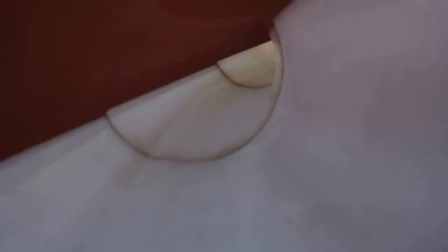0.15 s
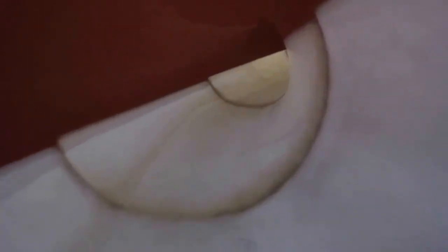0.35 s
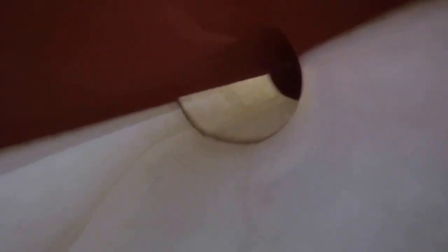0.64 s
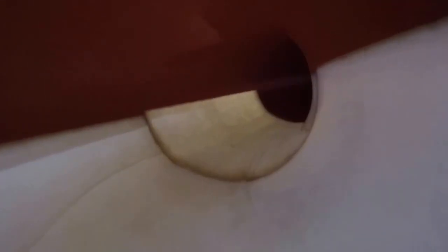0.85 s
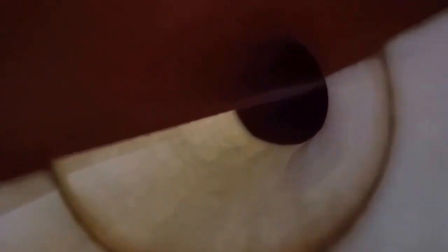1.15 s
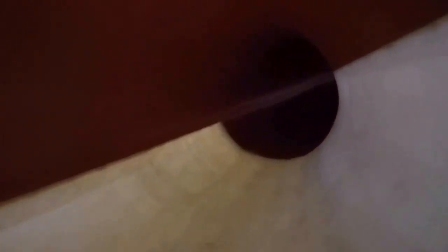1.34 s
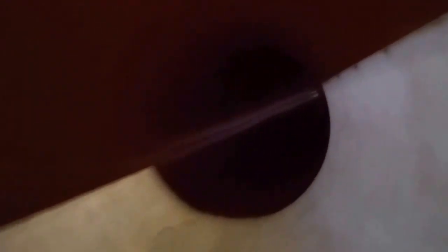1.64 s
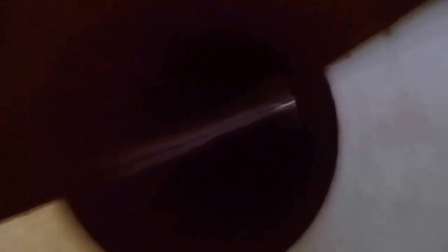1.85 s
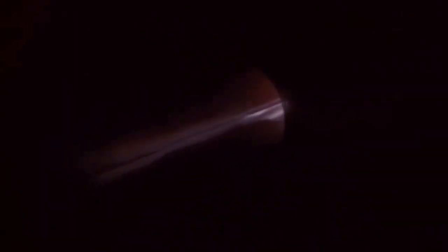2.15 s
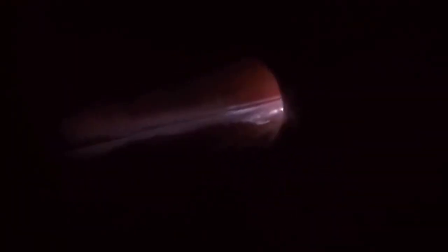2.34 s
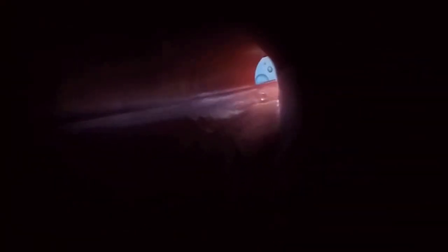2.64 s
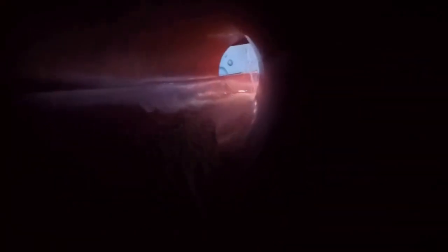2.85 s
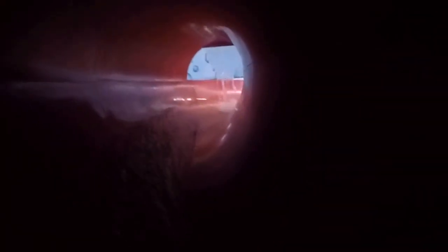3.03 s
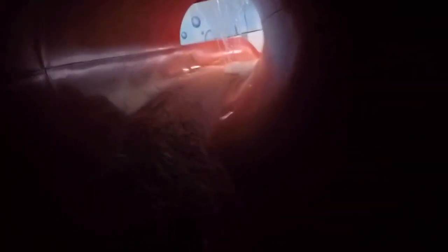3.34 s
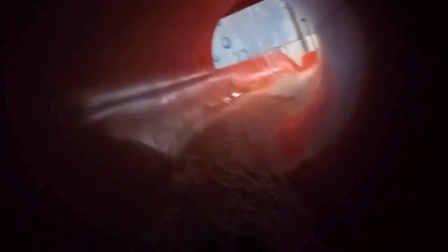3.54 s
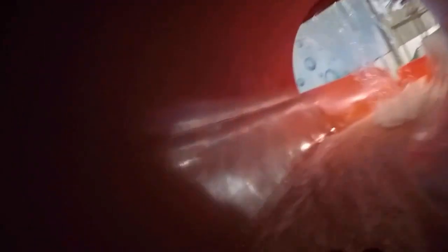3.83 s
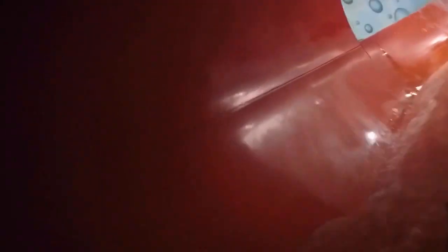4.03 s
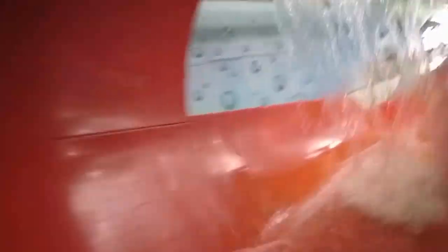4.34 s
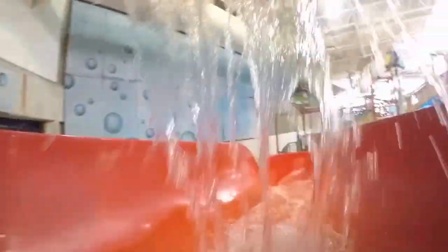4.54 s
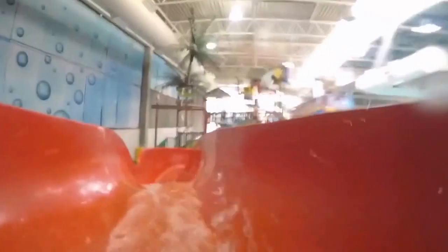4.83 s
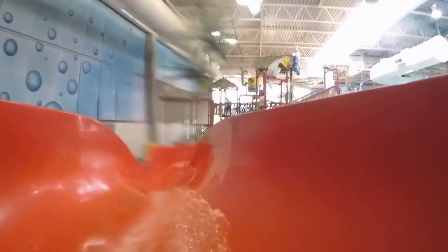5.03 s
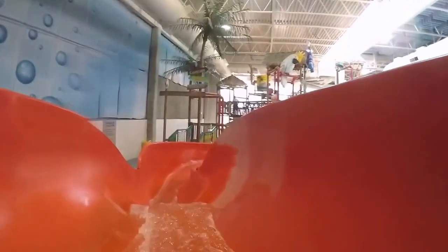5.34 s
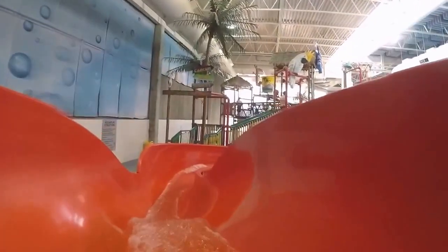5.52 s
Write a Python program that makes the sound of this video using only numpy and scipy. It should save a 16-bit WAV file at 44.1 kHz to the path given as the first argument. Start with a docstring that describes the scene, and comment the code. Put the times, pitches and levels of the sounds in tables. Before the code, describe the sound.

A close, mono ride recording: a thin sheet of water rushes and fizzes, with soft bumps at first. Hard rattling knocks, scuffs and deep thuds follow in clusters, some overloading. Falling water then smacks the case, leaving a brief wash, a dull lull and slowly returning muffled water in an indoor pool hall.

```python
"""A rider with a camera in a waterproof case slides down a plastic tube on a rushing film of water.
First come filtered noise for water and spray, a low rumble, and seams and bends that thump the body.
From about 2 s more and harder knocks (ringing shell notes) and scuffs (swelling noise) hit the case.
Near 4.75 s a curtain of water slaps the case (noise bursts and a low push) and wets the port.
One wash, a lull and a slow return follow: the run-out and the hall are faint and muffled."""
import sys
import numpy as np
from scipy.fft import rfft, irfft, next_fast_len
from scipy.io import wavfile
from scipy.ndimage import uniform_filter1d, map_coordinates

SR = 44100
rng = np.random.default_rng(int(sys.argv[2]) if len(sys.argv) > 2 else 0)


def unload_wav(signal):
    """Save mono or channel-first audio to the path in sys.argv[1] as 16-bit WAV at rate SR, clipped to [-1, 1]."""
    wavfile.write(
        sys.argv[1],
        SR,
        np.round(np.clip(np.atleast_2d(signal).T, -1, 1) * 32767).astype(np.int16),
    )


N = 250488
TIME = np.arange(N) / SR  # seconds, whole scene
HIT = np.arange(8192) / SR  # seconds, one short contact
FLOODED_S = 4.727  # the port starts to flood


def amp(db):
    """Turn decibels into a plain gain."""
    return 10 ** (np.asarray(db) / 20)


def unit(x):
    """Scale a sound to an average (rms) strength of 1."""
    return x / np.sqrt(np.mean(x ** 2) + 1e-20)


def along(points, hz):
    """Read a (frequency, level) curve, with frequency on a log axis."""
    point_hz, point_db = np.transpose(points)
    return np.interp(np.log(hz + 1), np.log(point_hz + 1), point_db)


def level_over_time(rows):
    """Join (time, level) points with straight lines, one value per sample."""
    times, levels = np.transpose(rows)
    return np.interp(TIME, times, levels)


def wobble(rate):
    """A smooth random curve through `rate` random points a second."""
    return map_coordinates(rng.standard_normal(400), [TIME * rate], mode="wrap")


def coloured(x, shape_db):
    """Filter a sound: shape_db gives the gain in dB at each frequency."""
    padded = next_fast_len(len(x) + 8192)
    gain = amp(shape_db(np.fft.rfftfreq(padded, 1 / SR)))
    return irfft(rfft(x, padded) * gain, padded)[:len(x)]


def noise(shape_db, size=N):
    """Random hiss with a chosen tone colour and an rms of 1."""
    return unit(coloured(rng.standard_normal(size), shape_db))


def causal(db):
    """Turn levels into a response that starts at once and then rings out (minimum phase)."""
    cepstrum = irfft(np.log(amp(db)))
    cepstrum[1:] *= 2
    cepstrum[len(cepstrum) // 2:] = 0
    return np.exp(rfft(cepstrum))


def hump(hz, centre_hz, octaves):
    """A bell of height 1 around centre_hz, its width given in octaves."""
    distance = np.log2((hz + 1) / centre_hz) / octaves
    return np.exp(-.5 * distance ** 2)


def swell(peak_s):
    """A contact force that rises to 1 at peak_s and dies away."""
    u = HIT / max(peak_s, 1e-4)
    return u * np.exp(1 - u)


def add(track, s, sound):
    """Mix a sound into the track at time s, cut off at the track's end."""
    room = track[max(round(s * SR), 0):][:len(sound)]
    room += sound[:len(room)]


def lift(modes, hz):
    """Boost in dB from resonances, each strongest at its own centre."""
    return sum(db / (1 + (2 * (hz - centre) / width) ** 2) for centre, width, db in modes)


# Tone of the case: (frequency [Hz], relative level [dB])
CASE_TONE = [(100, -9.5), (310, -0.5), (470, -15.5), (800, -1), (1200, 1), (1650, -0.5), (2200, -4.5),
             (2780, -1), (3300, -20), (4400, -18), (5500, -15.5), (6300, -32.5), (9000, -45.5),
             (15000, -40.5)]
# Notes of the struck shell: (frequency [Hz], width [Hz], boost [dB])
SHELL_NOTES = [(805, 180, 5.5), (1119, 80, 6), (1585, 260, 6), (2095, 360, 7), (2680, 160, 3.5),
               (5780, 520, 11)]


def shell(hz, centre_hz, focus_db):
    """Response of the case in dB; a contact favours the shell notes near centre_hz."""
    return along(CASE_TONE, hz) + lift(SHELL_NOTES, hz) + focus_db * hump(hz, centre_hz, 0.28)


def rub(centre_hz, swell_s, focus_db=10):
    """A short rub keeps the shell sounding, with a soft start."""
    return swell(swell_s) * noise(lambda hz: shell(hz, centre_hz, focus_db), size=len(HIT))


# The wet port: level while drowned, start of draining, speed of the sound's return
DROWNED_DB, DRAINS_S, RECOVERY_DB_PER_S = -61.5, 5.16, 23
# One wash of water runs over the case after the curtain
WASH_S, WASH_DB, WASH_WIDTH_S = 4.862, -53.5, .026
# Tone of water and hall through the wet port: (frequency [Hz], relative level [dB])
MUFFLED_TONE = [(150, 1), (330, -7), (520, -7), (850, -3.5), (1250, -7), (1530, 0), (1800, -6.5),
                (2200, -2.5), (2900, -5.5), (3500, -12), (5500, -12), (7200, -19.5), (9000, -24),
                (15000, -32)]


def runout():
    """Water and hall through the wet port: one wash, a lull, then the sound returns as the port drains."""
    level_db = DROWNED_DB + RECOVERY_DB_PER_S * np.maximum(TIME - DRAINS_S, 0)
    wash = amp(WASH_DB) * np.exp(-((TIME - WASH_S) / WASH_WIDTH_S) ** 2)
    return (amp(level_db) + wash) * noise(lambda hz: along(MUFFLED_TONE, hz))


# Shaking of the camera: (time [s], level before level_db [dB])
SHAKING = [(0.0, -40.5), (0.47, -37.5), (1.79, -39.5), (3.16, -33), (3.54, -37.5), (3.94, -29.5),
           (4.65, -32), (5.06, -52.5), (5.68, -58.5)]
# Tone of the rumble: (frequency [Hz], relative level [dB])
RUMBLE_TONE = [(11, -27.5), (18, -6), (32, 4), (59, -8.5), (92, -8), (199, -29), (289, -31.5), (400, -36.5),
               (520, -64), (880, -120)]


def rumble(level_db=4.0, lumps_db=2):
    """The uneven wall shakes the camera: low noise that swells and sinks in lumps."""
    lumps = amp(lumps_db * wobble(18))
    shaking = unit(lumps * noise(lambda hz: along(RUMBLE_TONE, hz)))
    return amp(level_over_time(SHAKING) + level_db) * shaking


SPRAY_GROWS = 1.25  # dB of spray per dB of flow
# Water under the rider: (time [s], flow level before the settings below [dB])
WATER_FLOW = [(0.0, -35.5), (2.1, -35), (3.14, -34.5), (3.33, -41.5), (3.51, -39.5), (3.77, -37.5),
              (4.18, -33.5), (4.6, -34)]
# Tone of the rushing sheet: (frequency [Hz], relative level [dB])
WATER_TONE = [(150, -12), (260, -15.5), (345, -5.5), (520, -15), (720, -6.5), (1050, -3.5), (1280, -8),
              (1650, -9), (2500, 0.5), (3000, -6), (3600, -9.5), (4600, -9), (7000, -22), (15000, -48)]
# Tone of the droplets: (frequency [Hz], relative level [dB])
SPRAY_TONE = [(1500, -39.5), (4000, -0.5), (5800, 4), (7400, 3.5), (8300, -3), (9600, -3), (11000, -5.5),
              (15300, -12.5)]
# Air and wall resonances of the case: (frequency [Hz], width [Hz], boost [dB])
CAVITY_NOTES = [(1612, 335, 9.5), (2141, 50, 8.5), (3313, 230, 12), (3737, 150, 9), (4090, 110, 4),
                (6600, 200, 6.5)]


def water(rush_db=2.5, spray_db=-8.0, curtain_db=4, curtain_s=.09, flutter_db=.5, drop_db=3,
          flood_s=0.005, leak_db=-25, leak_s=0.11):
    """The sheet of water rushes and throws droplets until the port floods; more flow throws more spray."""
    flow_db = level_over_time(WATER_FLOW)
    mist_db = flow_db.mean() + SPRAY_GROWS * (flow_db - flow_db.mean())

    rush_level = amp(flow_db + rush_db + flutter_db * wobble(14))
    rush = rush_level * noise(lambda hz: along(WATER_TONE, hz) + lift(CAVITY_NOTES, hz))

    # random drop sizes make the hiss grainy
    droplets = rng.standard_normal(N) * amp(drop_db * rng.standard_normal(N))
    droplets = unit(coloured(droplets, lambda hz: along(SPRAY_TONE, hz) + lift(CAVITY_NOTES, hz)))
    # the falling water comes close
    curtain = curtain_db * np.exp(-np.abs(TIME - FLOODED_S) / curtain_s)
    spray = amp(mist_db + spray_db + curtain + flutter_db * wobble(20)) * droplets

    since_flood = np.maximum(TIME - FLOODED_S, 0)
    open_port = np.exp(-since_flood / flood_s)  # a film closes over the port
    leak = amp(leak_db) * np.exp(-since_flood / leak_s)  # the curtain falls away behind
    wet_port = leak * spray + runout()
    return open_port * (rush + spray) + (1 - open_port) * wet_port


# Water curtain hitting the case: (time [s], crash level [dB], time to swell [s])
CURTAIN_SLAPS = [(4.745, 5, 0.0012), (4.7547, 1.5, .0011)]
# Tone of the crash: (frequency [Hz], relative level [dB])
SPLASH_TONE = [(100, -7.5), (380, -3), (900, -12), (2000, 5), (3200, -7.5), (4800, -13.5), (7000, -8.5),
               (9000, -24), (15000, -29)]


def slaps(shove_db=4, shove_hz=112, shove_s=0.0031, ring_db=-23, ring_s=0.07):
    """Falling water strikes the port: a shove of pressure, a broad crash, then the shell rings on."""
    out = np.zeros(N)
    for s, db, swell_s in CURTAIN_SLAPS:
        crash = swell(swell_s) * noise(lambda hz: along(SPLASH_TONE, hz), size=len(HIT))
        fade = amp(ring_db - 60 * HIT / ring_s)  # drops 60 dB in ring_s
        ring = fade * noise(lambda hz: shell(hz, 1800, focus_db=4.5), size=len(HIT))
        add(out, s, amp(db) * (crash + ring))
    shove = amp(shove_db) * swell(shove_s) * np.sin(2 * np.pi * shove_hz * HIT)
    add(out, CURTAIN_SLAPS[0][0], shove)  # only the first slap shoves
    return out


PUSH_SWELL_S = .0082
# A bump drags the case along the wall; this rub peaks before the push does
DRAG_LEAD_S, DRAG_HZ, DRAG_SWELL_S = .002, 890, .0035
# Bumps of the ride: (time [s], level before push_db and body_db [dB], push frequency [Hz],
# drag level before thud_db and drag_db [dB])
RIDE_BUMPS = [(0.298, -23.5, 70, -51), (0.652, -28, 40, -32.5), (0.746, -13.5, 49.5, -24.5),
              (2.044, -1.5, 57, -19.5), (2.188, -21.5, 93, -28), (2.294, -11.5, 47.3, -35.5),
              (2.326, -8, 51, -49), (2.42, -29, 101, -35.5), (2.83, -16, 70, -50),
              (3.194, -9.5, 32.1, -23.5), (3.21, -6, 67.3, -33.5), (3.233, -21, 95, -29),
              (3.375, -13.5, 40.7, -48), (3.731, -5.5, 77.2, -29.5), (3.914, -8, 30.8, -49),
              (4.131, -6, 80.7, -26), (4.283, -10.5, 32.5, -38), (4.329, -8, 56, -20),
              (4.349, -4, 41.4, -14.5), (4.524, -10, 51.7, -39.5), (4.748, -1.5, 51.7, -23.5)]
# Tone of the thud: (frequency [Hz], relative level [dB])
THUD_TONE = [(100, -10.5), (170, 1), (250, -2.5), (340, -0.5), (470, -22), (850, -5.5), (1500, -47.5),
             (4000, -77)]


def bumps(push_db=-1, body_db=-16, body_hz=91, body_s=0.015, resonance_db=11, thud_db=-4, drag_db=-7.0):
    """A slow push rings the tube wall, most near the wall's own note; the dragged case thuds and rubs."""
    out = np.zeros(N)
    for s, db, push_hz, grip_db in RIDE_BUMPS:
        push = amp(push_db) * swell(PUSH_SWELL_S) * np.sin(2 * np.pi * push_hz * HIT)
        ring_level = amp(body_db + resonance_db * hump(push_hz, body_hz, 0.36))
        ring = ring_level * swell(body_s) * np.sin(2 * np.pi * body_hz * HIT)
        thud = swell(0.0072) * noise(lambda hz: along(THUD_TONE, hz), size=len(HIT))
        add(out, s - .002, amp(db) * (push + ring) + amp(grip_db + thud_db) * thud)
        add(out, s - DRAG_LEAD_S, amp(grip_db + drag_db) * rub(DRAG_HZ, DRAG_SWELL_S))
    return out


# Soft rubs on the case: (time [s], level before level_db [dB], centre frequency [Hz], time to swell [s])
SOFT_SCUFFS = [(2.038, -16, 1660, 0.009), (2.605, -19, 1150, 0.0043), (2.874, -14.5, 2040, .004),
               (3.108, -21, 1660, 0.0075), (3.137, -10, 1800, 0.0045), (3.1805, -4, 1860, 0.0028),
               (3.303, -2.5, 1350, 0.0038), (3.32, -22, 1160, 0.015), (3.7195, -11, 1290, 0.003),
               (4.12, -17.5, 1090, 0.0043), (4.294, -14.5, 1390, 0.0093), (4.329, -11, 1220, 0.0017),
               (5.288, -24, 1550, 0.004), (5.317, -26.5, 1350, 0.0039)]


def scuffs(level_db=-7):
    """The case brushes against the rider and the wall: short swells of shell-coloured noise."""
    out = np.zeros(N)
    for s, db, centre_hz, swell_s in SOFT_SCUFFS:
        add(out, s - .001, amp(db + level_db) * rub(centre_hz, swell_s))
    return out


# Hard contacts on the case: (time [s], level before level_db [dB], centre frequency [Hz],
# hardness [dB], size of each rebound against the one before [0-1])
HARD_KNOCKS = [(0.036, -19.5, 1880, -14, 0.53), (2.054, -7, 2160, -6, 0.42), (2.582, -11, 1980, -8, 0.3),
               (2.64, -8.5, 1850, 3, 0.6), (3.071, -11.5, 2540, 13.5, 1), (3.1421, -1.5, 2730, 16, 0.67),
               (3.2305, 0, 2630, -3, 0.3), (3.254, -12.5, 2760, 0, 0.34), (3.3022, -1.5, 1380, -10.5, 0.1),
               (3.356, -19, 2860, -2, 0.4), (3.437, -19, 2800, 7, 0.4), (3.485, -22.5, 2730, -3, 0.46),
               (3.538, -12.5, 2450, -18, 0.15), (3.92, -25, 2720, 20, 0.67), (4.2405, -3.5, 1450, -1, 0.73),
               (4.3663, -5, 1660, 9, 0.63), (4.67, -11, 2440, 2, 0.36), (5.005, -23, 1850, -9.5, 0.44),
               (5.027, -28, 1580, -2, 0.16), (5.276, -16.5, 1820, -3.5, 0.48)]


def knocks(level_db=-2, focus_db=10.0, bounce_s=0.001657, ring_db=-22, ring_s=0.058,
           mount_db=-28, mount_hz=320, mount_s=0.0016):
    """Contacts chatter in quick rebounds; the shell rings briefly and the mount gives a low tock."""
    out = np.zeros(N)
    hz = np.fft.rfftfreq(len(HIT), 1 / SR)
    spread = np.exp(-2j * np.pi * np.sqrt(hz / 500))  # bending waves: low notes travel more slowly
    tock = swell(mount_s) * np.sin(2 * np.pi * mount_hz * HIT)
    for s, db, centre_hz, hard_db, rebound in HARD_KNOCKS:
        # hard corners reach the highest shell note, soft contacts move the mount
        tick = hard_db * hump(hz, 5500, 0.25)
        shell_db = shell(hz, centre_hz, focus_db) + tick

        gaps = bounce_s * rng.uniform(0.498, 1.8, size=5)
        delays = np.cumsum(gaps) - gaps[0]
        sizes = np.clip(rebound, 0, 1) ** np.arange(len(gaps))
        contacts = sizes @ np.exp(-2j * np.pi * np.outer(delays, hz))  # phase turns delay each rebound
        blow = irfft(causal(shell_db) * contacts * spread)
        # scale so the loudest 2 ms has an rms of 1
        blow /= np.sqrt(np.max(uniform_filter1d(blow ** 2, size=88, mode="constant")))

        shell_noise = unit(irfft(amp(shell_db) * rfft(rng.standard_normal(len(HIT)))))
        ring = amp(ring_db - 60 * HIT / ring_s) * shell_noise  # drops 60 dB in ring_s
        knock = blow + ring + amp(mount_db - hard_db) * tock
        add(out, s, amp(db + level_db) * knock[:len(HIT) // 2])
    return out


def scene():
    """Everything that reaches the one microphone."""
    return (water() + rumble() + bumps() + knocks() + scuffs() + slaps())[None]


TOP_HZ = 15250  # the treble is cut above this


def record(dry):
    """The hardest blows overload the camera, which also cuts the high treble and the deepest bass."""
    clipped = dry[0] / (1 + np.abs(dry[0]) ** 10) ** (1 / 10)

    def band_db(hz):
        """Lose 1 dB per 14 Hz above the top, and up to 30 dB towards 0 Hz."""
        return -np.clip((hz - TOP_HZ) / 14, 0, 120) - 30 * np.exp(-hz / 7)

    return coloured(clipped, band_db)[None]


dry = scene()
out = record(dry)
unload_wav(out)
```